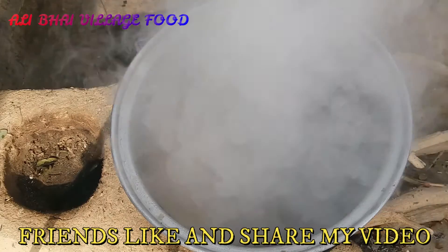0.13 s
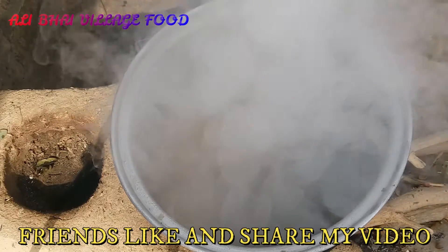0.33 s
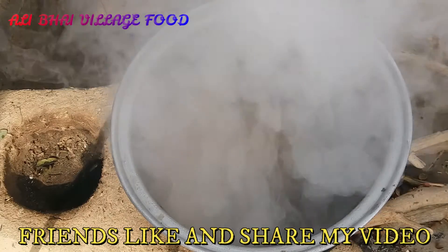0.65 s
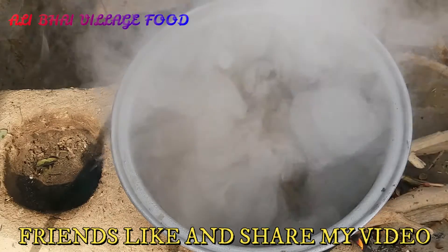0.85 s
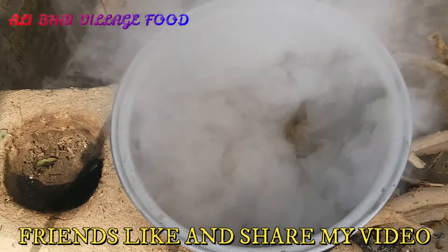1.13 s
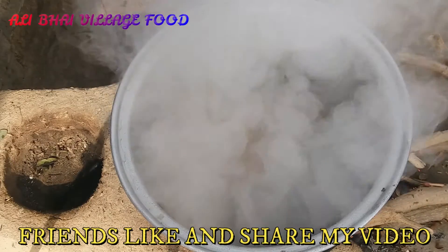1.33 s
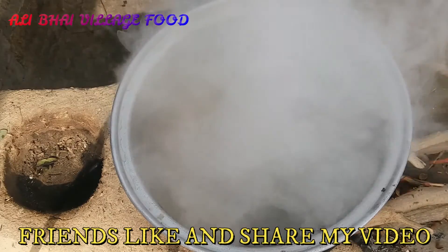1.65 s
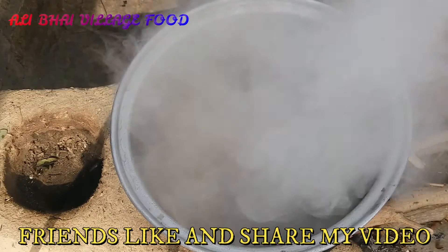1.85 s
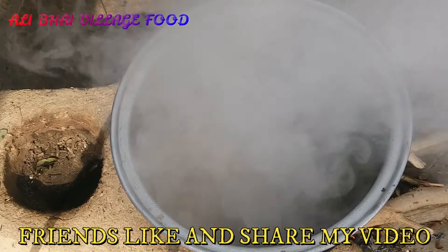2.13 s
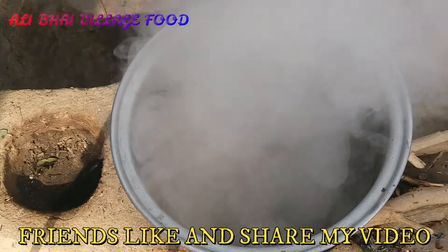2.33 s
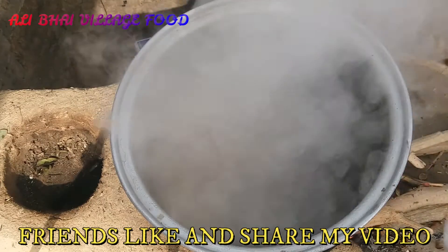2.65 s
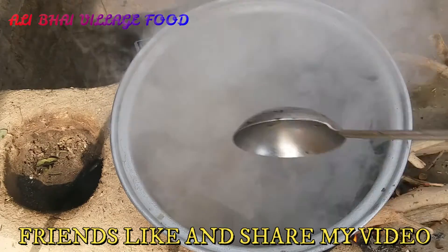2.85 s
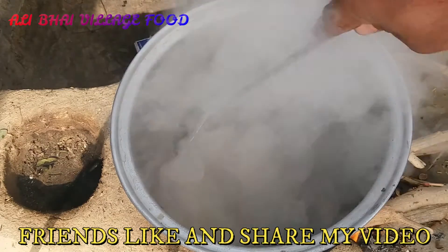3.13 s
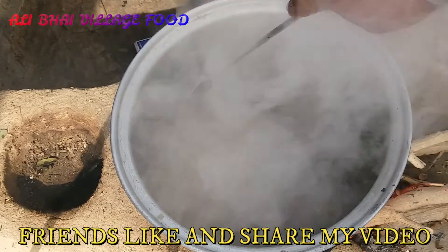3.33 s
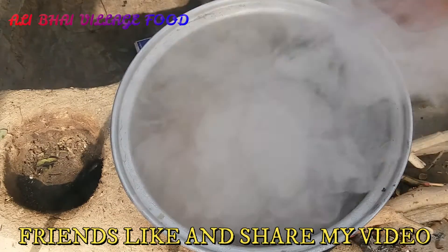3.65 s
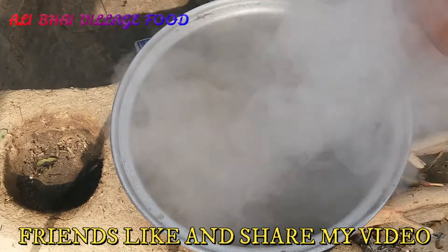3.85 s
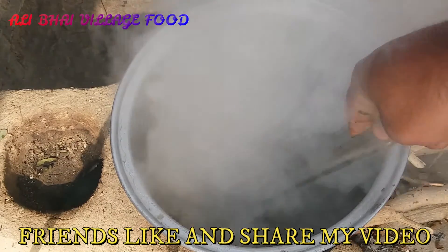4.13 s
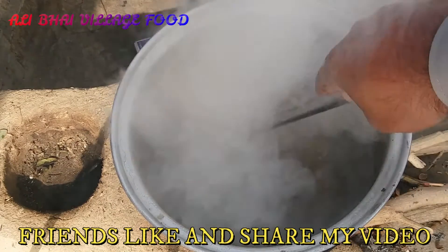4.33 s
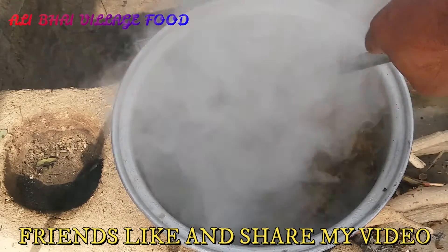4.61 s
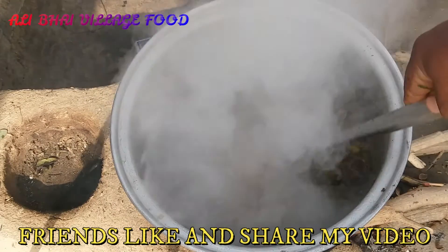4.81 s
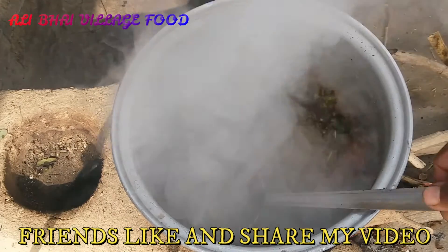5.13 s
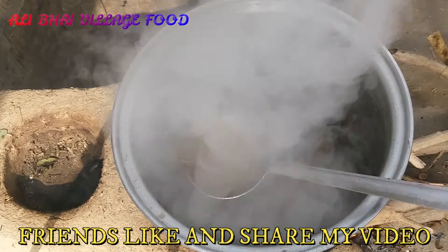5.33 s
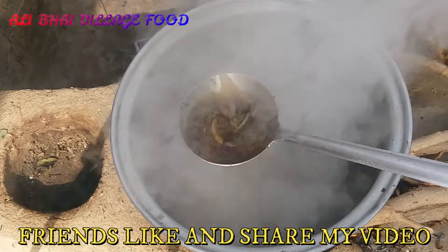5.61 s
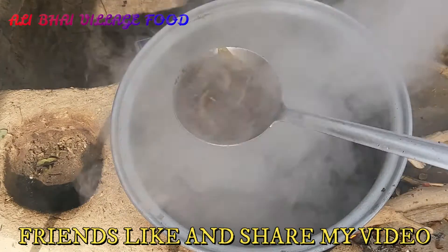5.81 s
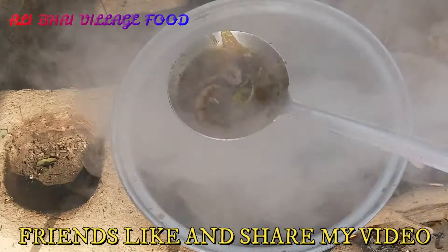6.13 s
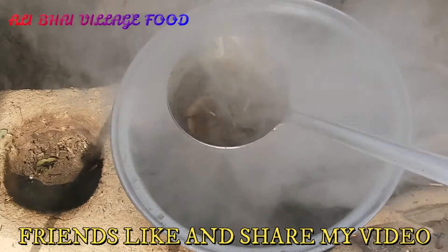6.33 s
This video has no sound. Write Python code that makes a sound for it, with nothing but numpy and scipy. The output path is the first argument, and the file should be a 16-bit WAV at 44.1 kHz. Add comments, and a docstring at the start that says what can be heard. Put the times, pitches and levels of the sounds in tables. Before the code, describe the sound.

Outdoors in a small walled yard, a large pot of stew simmers close to the microphone, soft hiss over low fire rumble with occasional twig snaps. A crow caws across the yard, a steel ladle clacks hard on the pot, then stirs with short sizzling sloshes as a second, hoarser caw sounds. The ladle lifts, drops trickle and plink, and a goat begins a quavering bleat, cut off at the end.

```python
"""Stew simmering over a wood fire

A big metal pot of stew simmers in a village yard: noise bursts make its hiss, rumble and cracking twigs.
A ladle knocks (fading sine tones) and stirs, washing broth up the hot wall, where shaped noise sizzles.
Then it lifts and drips, each drop a puff of noise and a tiny ringing bubble.
A crow caws twice and a goat starts a quavering bleat, both pulses and air through throat resonances;
a faint far call is one sinking tone. The yard walls answer with echoes."""
import sys
import numpy as np
from scipy import signal
from scipy.fft import rfft, irfft, next_fast_len
from scipy.io import wavfile
from scipy.ndimage import uniform_filter1d, map_coordinates

SR = 44100
rng = np.random.default_rng(int(sys.argv[2]) if len(sys.argv) > 2 else 0)


def to_wav(sig):
    """Store sig (one row per channel, or 1-D mono) as 16-bit WAV at the path in sys.argv[1].

    Samples outside -1..1 are clipped; the rate is SR.
    """
    pcm = np.clip(np.atleast_2d(sig), -1, 1) * 32767
    pcm = np.round(pcm).astype(np.int16)
    wavfile.write(sys.argv[1], SR, pcm.T)  # frames by channels


N = 285568  # length of the scene in samples


def amp(db):
    """Decibels to gain."""
    return 10 ** (np.asarray(db) / 20)


def unit(x):
    """Scaled to rms 1."""
    return x / np.sqrt(np.mean(x ** 2) + 1e-20)


def clock():
    """The time of every sample, in seconds."""
    return np.arange(N) / SR


def along(points, hz):
    """Read (frequency, value) points at hz, on a log frequency axis."""
    f, v = np.transpose(points)
    return np.interp(np.log(hz + 1), np.log(f + 1), v)


def curves(rows):
    """One value per sample for each column after the time."""
    s, *cols = np.transpose(rows)
    return [np.interp(clock(), s, c) for c in cols]


def wobble(rate):
    """A smooth random curve with rate knots a second."""
    knots = rng.standard_normal(int(N * rate / SR) + 4)
    return map_coordinates(knots, [np.arange(N) * rate / SR])


def envelope(start, length, attack, release):
    """A smooth rise from start, a hold until length has passed, then a smooth fall."""
    t = clock() - start
    ramp = np.minimum(t / attack, 1 - (t - length) / release)
    return np.sin(np.pi / 2 * np.clip(ramp, 0, 1)) ** 2


def swell(s, width):
    """A bell-shaped push that reaches 1 at time s."""
    return np.exp(-np.minimum(((clock() - s) / width) ** 2, 20))


def filtered(x, response):
    """x times a complex response of frequency."""
    m = next_fast_len(N + SR // 2)
    return irfft(rfft(x, m) * response(np.fft.rfftfreq(m, 1 / SR)), m)[..., :N]


def coloured(x, spectrum):
    """x through a causal filter with the given (frequency [Hz], gain [dB]) shape."""
    size = 4096
    cepstrum = irfft(np.log(amp(along(spectrum, np.fft.rfftfreq(size, 1 / SR))) + 1e-6))
    # folding the cepstrum makes the filter respond as early as it can
    cepstrum[1:size // 2] *= 2
    cepstrum[size // 2 + 1:] = 0
    impulse = irfft(np.exp(rfft(cepstrum)))
    return filtered(x, lambda hz: rfft(impulse, next_fast_len(N + SR // 2)))


def add(track, s, sound):
    """Mix a sound in at time s."""
    part = track[..., round(s * SR):][..., :sound.shape[-1]]
    part += sound[..., :part.shape[-1]]


def burst(t, t60):
    """A stereo puff of noise that falls by 60 dB within t60 seconds."""
    return rng.standard_normal((2, len(t))) * amp(-60 * t / t60)


# how alike left and right sound: (frequency [Hz], likeness [0-1])
LIKENESS = [(60, 0.99), (130, 1), (290, 0.84), (640, 0.8), (1400, 0.36), (6000, 0.28), (15000, 0.15)]


def spread(pair):
    """Two unrelated signals to left and right: alike in the bass, apart in the treble."""
    def turn(hz):
        return np.arccos(np.clip(along(LIKENESS, hz), -1, 1)) / 2
    mid, side = filtered(pair, lambda hz: np.array([np.cos(turn(hz)), np.sin(turn(hz))]))
    return np.array([mid + side, mid - side])


def bubbling(spectrum, rate, pop_db, patchy_db):
    """Countless tiny bursts merge to a patchy rush; rate a second stand out as single pops."""
    z = signal.stft(rng.standard_normal((2, N)), nperseg=512)[2]
    # random patches, smoothed over frequency and then over time
    field = uniform_filter1d(rng.standard_normal(z.shape[1:]), size=5, axis=0)
    field = uniform_filter1d(field, size=8, axis=1)
    rush = signal.istft(z * amp(patchy_db * unit(field)), nperseg=512)[1][:, :N]
    pops = (rng.random((2, N)) < rate / SR) * rng.standard_normal((2, N))
    return unit(coloured(spread(unit(rush) + amp(pop_db) * unit(pops)), spectrum))


# how long the yard's echo tail takes to fall by 60 dB: (frequency [Hz], time [s])
YARD_TAIL = [(200, 0.13), (2000, 0.33), (10000, 0.013)]


def yard(x, wet_db, walls_db, farthest=.012):
    """Direct sound, a few echoes off near walls and a short tail, different at each ear."""
    hz, t, z = signal.stft(rng.standard_normal((2, SR // 3)), SR, nperseg=256)
    tail = signal.istft(z * amp(-60 * t / along(YARD_TAIL, hz)[:, None]), SR, nperseg=256)[1]
    echo = amp(wet_db) * tail / np.linalg.norm(tail[0])
    for ear in echo:
        arrivals = (rng.uniform(.0005, farthest, size=8) * SR).astype(int)
        ear[arrivals] += amp(walls_db) * rng.choice([-1, 1], size=8) / np.sqrt(8)
    echo[:, 0] += 1  # the direct sound
    return signal.fftconvolve(np.atleast_2d(x), echo / np.linalg.norm(echo[0]), axes=1)[:, :N]


def voice(pitch, jitter):
    """One pulse per cycle of a vibrating membrane, and the air that rushes through as it opens."""
    phase = 2 * np.pi * np.cumsum(pitch * (1 + jitter * wobble(150))) / SR
    order = np.floor(SR / 2 / pitch.max()) - 1  # as many harmonics as fit
    cycle = (phase / np.pi + 1) % 2 / 2 - .5
    pulses = np.sinc((2 * order + 1) * cycle) / np.sinc(cycle)
    air = rng.standard_normal(N) * np.exp(0.11 * np.cos(phase))
    return unit(pulses - pulses.mean()), unit(air)


def blend(pulses, air, rough):
    """Mix pulses and air so that a share rough of the power is air."""
    share = np.clip(rough, 0, 1)
    return np.sqrt(1 - share) * pulses + np.sqrt(share) * air


def resonances(modes, broad_hz, low_db):
    """The shape of a set of steep-sided resonances; broad_hz widens all, low_db lifts the lowest."""
    hz = np.geomspace(50, 20000, num=600)
    power = 0
    for centre, width, db in modes:
        power = power + amp(db) ** 2 / (1 + ((hz - centre) / (width + broad_hz)) ** 2) ** 2
    return np.transpose([hz, 10 * np.log10(power) + along([(1200, low_db), (1700, 0)], hz)])


FAR_START_S, FAR_LENGTH_S, FAR_FADE_S = 4.32, 0.25, 0.045
FAR_HZ, FAR_SAG_HZ_PER_S, FAR_DB = 642, 175, -51.5  # first pitch, how fast it sinks, level


def far_call():
    """Only the lowest partial of a distant call carries this far: a faint tone that sinks in pitch."""
    since = np.clip(clock() - FAR_START_S, 0, 1)
    tone = unit(np.sin(2 * np.pi * np.cumsum(FAR_HZ - FAR_SAG_HZ_PER_S * since) / SR))
    level = amp(FAR_DB) * envelope(FAR_START_S, FAR_LENGTH_S, FAR_FADE_S, FAR_FADE_S)
    return yard(level * tone, wet_db=-10, walls_db=-10)


# how strongly the pot hisses and rumbles:
# (time [s], hiss level [dB], rumble level [dB]), before flicker and left-right balance
BOIL_LEVELS = [(0.0, -45.5, -52), (0.35, -51, -58), (0.9, -56, -58), (1.26, -46, -50), (1.9, -44, -48),
               (4.6, -42.5, -48.5), (5.05, -47.5, -47.5), (6.48, -47, -46)]
# tone of the fine bubbles: (frequency [Hz], relative level per Hz [dB])
HISS_TONE = [(150, -35), (250, -0.5), (298, -1.5), (393, -0.5), (444, -2.5), (618, -2.5), (831, -6.5),
             (1140, -4), (1330, -7.5), (1850, -4.5), (2320, -7), (6040, 0.5), (9490, -19), (15200, -16.5),
             (16000, -12.5)]
# tone of the fire and boil: (frequency [Hz], relative level per Hz [dB])
RUMBLE_TONE = [(15, -36), (25, -47), (41, -17), (86, 2.5), (118, -5), (151, -4.5), (206, -11.5), (292, -28),
               (400, -24.5), (520, -46), (880, -120)]


def simmer():
    """Fine bubbles hiss at the pot's rim over the rumble of fire and boil."""
    hiss_db, rumble_db = curves(BOIL_LEVELS)
    hiss = bubbling(HISS_TONE, rate=350, pop_db=-6.0, patchy_db=2.5)
    hiss = amp(hiss_db + 2.34 * wobble(6.8)) * hiss
    rumble = bubbling(RUMBLE_TONE, rate=37, pop_db=-31.0, patchy_db=1.0)
    rumble = amp(rumble_db + 0.53 * wobble(22)) * rumble
    return (hiss + rumble) * amp([[.7], [-.7]])  # slightly to the left


# cracks of burning twigs: (time [s], relative level [dB])
TWIG_CRACKS = [(0.264, -35.5), (1.0425, -42.5), (1.5054, -40), (1.7631, -27.5), (2.23, -37.5),
               (4.2094, -31), (4.8246, -46), (5.3877, -33)]
# tone of a crack: (frequency [Hz], filter gain [dB])
SNAP_TONE = [(200, -36), (900, 8.5), (2500, 9.5), (4500, 21.5), (6500, 20), (9000, 9.5), (16000, -2)]


def twigs():
    """Wood splits in the fire with a dry snap: a very short puff of noise."""
    out, t = np.zeros((2, N)), np.arange(SR // 8) / SR
    for s, db in TWIG_CRACKS:
        add(out, s, amp(db - 10.5) * burst(t, 0.048))
    return coloured(spread(out), SNAP_TONE)


# the goat's throat: (resonance [Hz], basic width [Hz], relative level [dB])
GOAT_RESONANCES = [(735, 10, -1.5), (1160, 9, -6), (1840, 40, -10.5), (2440, 17, -3), (2836, 12, 4),
                   (3070, 41, -1), (4080, 37, -7), (4360, 62, 2), (4800, 32, -21), (5070, 65, -15)]
# quavers of the bleat: (time [s], pitch lift [Hz])
PITCH_QUAVERS = [(6.09, 53.2), (6.182, 41.6), (6.274, 44.7), (6.329, 34.17), (6.416, 60.4), (6.485, 31.47)]
QUAVER_S = .027  # width of each bell-shaped quaver, from its middle to 1/e
BLEAT_START_S, BLEAT_ATTACK_S, BLEAT_DB = 5.955, 0.04, -31  # level before the mouth's effect
OPEN_S, OPENING_S = 6.3, .32  # the mouth is wide open at this time, after opening for this long
# pitch under the quavers, closed and open; a closed mouth is softer than an open one by CLOSED_DB
CLOSED_HZ, OPEN_HZ, CLOSED_DB = 310.5, 360.6, -6.5
# share of air on a steady pitch, and the pitch speed that would leave only air
BLEAT_ROUGH, ROUGH_SWING_HZ_PER_S = .06, 6500


def goat():
    """A bleat that rises as the mouth opens and quavers on top; it turns rough while the pitch swings."""
    opening = envelope(OPEN_S - OPENING_S, N / SR, OPENING_S, OPENING_S)
    quaver = sum(lift * swell(s, QUAVER_S) for s, lift in PITCH_QUAVERS)
    pitch = CLOSED_HZ + (OPEN_HZ - CLOSED_HZ) * opening + quaver
    # nearly clean on a steady pitch; the faster the pitch moves, the more air
    rough = BLEAT_ROUGH + np.abs(np.gradient(pitch)) * SR / ROUGH_SWING_HZ_PER_S
    pulses, air = voice(pitch, jitter=.006)
    # every quaver pushes harder as the pitch rises
    push = pitch / uniform_filter1d(pitch, size=SR // 10) - 1
    cry = np.zeros(N)
    for formant in GOAT_RESONANCES:
        # the trembling throat makes each resonance flutter on its own; the low ones stay clear
        flutter = amp(20 * push + 2.6 * wobble(55))
        source = blend(pulses, air, rough * min(formant[0] / 2000, 1))
        cry += flutter * coloured(source, resonances([formant], broad_hz=142, low_db=2.5))
    # weak fundamental, little treble
    cry = coloured(cry, [(380, -12.5), (620, -5.5), (5300, -2.5), (7000, -10), (11000, -25)])
    sounding = envelope(BLEAT_START_S, N / SR, BLEAT_ATTACK_S, BLEAT_ATTACK_S)
    level = amp(BLEAT_DB + CLOSED_DB * (1.5 - opening)) * sounding
    cry = cry / cry[sounding > 0].std() * level
    return yard(cry, wet_db=-11, walls_db=-6, farthest=.006)


# the crow's throat in each caw: (resonance [Hz], basic width [Hz], relative level [dB])
FIRST_CAW_THROAT = [(770, 7, -14), (1210, 17, -13.5), (1410, 64, -12), (1763, 27, 1.5), (1900, 10, -6),
                    (2094, 16, 0.5), (2500, 75, -11), (2930, 56, -17)]
SECOND_CAW_THROAT = [(640, 16, -25), (810, 56, -15.5), (940, 22, -23), (1375, 40, -4.5), (1850, 71, 2),
                     (2090, 27, -7.5), (2335, 48, -5), (2880, 20, -24), (3110, 30, -12.5)]
# tone of the airy upper part of a caw: (frequency [Hz], relative level per Hz [dB])
RASP_TONE = [(1940, -34), (3300, -6.5), (3470, -14.5), (4000, -10), (4310, 0), (5350, -0.5), (6480, -9),
             (6960, -7), (9460, -31), (11000, -45), (14300, -54), (22000, -120)]
# (start [s], length [s], time of greatest effort [s], width of that push [s],
#  top pulse rate [Hz], least roughness [0-1], voice level at full effort [dB], rasp level likewise [dB])
CAW_CALLS = [(2.995, 0.316, 3.195, .15, 80.64, 0.04, -28.5, -31.5),
             (4.02, 0.34, 4.255, .135, 76.7, 0.2, -29.5, -32)]
CAW_ATTACK_S, CAW_RELEASE_S = 0.077, 0.051
SLACK_SAG_HZ, SLACK_ROUGH = 9.5, 0.55  # a slack throat beats slower and hoarser
SLACK_VOICE_DB, SLACK_RASP_DB = -5, -6  # a slack throat is also softer


def caw(row, throat, broad_hz):
    """Slow pulses ring the throat, with mostly air above; effort makes it faster, clearer and louder."""
    start, length, peak_s, width, top_hz, least_rough, voice_db, rasp_db = row
    slack = 1 - swell(peak_s, width)
    rough = least_rough + (SLACK_ROUGH - least_rough) * slack
    pulses, air = voice(top_hz - SLACK_SAG_HZ * slack, jitter=.002)
    body = unit(coloured(blend(pulses, air, rough), resonances(throat, broad_hz, low_db=3.5)))
    rasp = unit(coloured(blend(pulses, air, rough + 0.76), RASP_TONE))
    level = envelope(start, length, CAW_ATTACK_S, CAW_RELEASE_S) * amp(0.46 * wobble(78))
    body = amp(voice_db + SLACK_VOICE_DB * slack) * body
    rasp = amp(rasp_db + SLACK_RASP_DB * slack) * rasp
    return level * (body + rasp)


def crow():
    """Two caws, the second lower and hoarser, echoing off the walls."""
    first = caw(CAW_CALLS[0], FIRST_CAW_THROAT, broad_hz=51.4)
    second = caw(CAW_CALLS[1], SECOND_CAW_THROAT, broad_hz=79)
    return yard(first + second, wet_db=-7.5, walls_db=-2)


# sound from across the yard: (frequency [Hz], phase by which left leads right [radians])
LEFT_LEAD = [(500, 0.4), (1300, 2), (2200, 0.91), (4400, 1.65), (5600, 0.41)]


def from_aside(pair):
    """A call from across the yard meets the two microphone ports out of step."""
    return filtered(pair, lambda hz: np.exp(.5j * along(LEFT_LEAD, hz) * np.array([[1], [-1]])))


# drops and splats: (time [s], relative level [dB], starting pitch [Hz])
DROPS = [(3.967, -19, 2800), (5.037, -33.5, 2700), (5.042, -33.5, 1900), (5.243, -29.5, 1700),
         (5.293, -33, 6440), (5.325, -31, 4550), (5.362, -32, 4930), (5.448, -29.5, 6140),
         (5.476, -27.5, 4330), (5.501, -33, 5810), (5.544, -26, 5940), (5.613, -37, 556), (5.625, -28, 630),
         (5.654, -34, 3980)]
TRICKLE_START_S, TRICKLE_S = 5.17, .5
TRICKLE_DB = -39  # level of the softest trickle drop, on the scale of the drops above


def drips():
    """Each drop splats on the broth and rings a tiny bubble; a fine trickle follows the lifted ladle."""
    out, t = np.zeros((2, N)), np.arange(SR // 16) / SR
    bubbles = np.zeros(N)
    trickle = []
    for when, size, small in rng.random((14, 3)):
        trickle.append((TRICKLE_START_S + TRICKLE_S * when, TRICKLE_DB + 5 * size, 1800 * 3.73 ** small))
    for s, db, pitch in list(DROPS) + trickle:
        splat = burst(t, .016)
        # low-pitched drops splat with a duller body
        body = signal.lfilter(*signal.butter(2, np.clip(pitch, 300, 7000), fs=SR), splat)
        add(out, s, amp(db - 8.5) * splat + amp(db - 10) * body / body[:, :SR // 200].std())
        # the bubble's pitch rises as it rings
        ring = np.sin(2 * np.pi * pitch * t * (1 + 6 * t))
        add(bubbles, s, amp(db - 2 - 60 * t / .012) * ring)
    splats = coloured(spread(out), [(150, -7), (600, -9.0), (6500, -1.5), (9000, -1), (15000, -11)])
    return splats + yard(bubbles, wet_db=-16, walls_db=-8)


# tone of the hot wall: (frequency [Hz], relative level per Hz [dB])
SIZZLE_TONE = [(820, -29), (1400, -8.5), (1700, -15), (2260, -2), (2630, -7.5), (2950, -7.5), (3330, -9.5),
               (3690, 1), (6390, 5.5), (10500, -22.5), (13500, -16.5), (16000, -18)]
# tone of the broth as it is pushed, turned and scooped: (frequency [Hz], relative level per Hz [dB])
PUSH_TONE = [(88, -49), (150, -2), (360, -4.5), (431, 2), (611, -6), (969, -3), (1550, -13), (1920, -14),
             (2200, -29), (2860, -44), (4840, -120)]
TURN_TONE = [(88, -32), (150, -8), (329, 5), (390, -4), (597, -7.5), (1200, -8), (2200, -7), (2860, -10),
             (4840, -120)]
SCOOP_TONE = [(88, -43), (150, -18), (254, -10), (315, -7.5), (403, -11), (611, -11.5), (960, 1.5),
              (1300, -9.5), (2200, -8), (2860, -38), (4840, -120)]
# sweeps of the ladle: (start [s], length [s], sizzle rise [s],
#  sizzle level [dB], slosh level [dB]), before flicker and left-right balance
LADLE_SWEEPS = [(3.621, 0.33, 0.089, -33, -41.5), (4.287, .18, 0.11, -34.5, -40),
                (4.41, 0.333, 0.15, -41, -44.5), (4.729, 0.18, 0.13, -27.5, -36.5)]
SWEEP_RELEASE_S = 0.067
SLOSH_PEAK, SLOSH_WIDTH = 0.67, 0.45  # when the broth moves most, and for how long (shares of a sweep)


def stirring():
    """Each sweep of the ladle pushes a wave of broth, and the hot wall sizzles while it is wetted."""
    sizzle = bubbling(SIZZLE_TONE, rate=1500, pop_db=-2, patchy_db=3.2)
    out = np.zeros((2, N))
    tones = [PUSH_TONE, TURN_TONE, TURN_TONE, SCOOP_TONE]
    for (start, length, rise, sizzle_db, slosh_db), tone in zip(LADLE_SWEEPS, tones):
        wave = swell(start + SLOSH_PEAK * length, SLOSH_WIDTH * length) ** .5
        wave = wave * envelope(start, length, SWEEP_RELEASE_S, SWEEP_RELEASE_S)
        slosh = wave * bubbling(tone, rate=130, pop_db=-7, patchy_db=3.0)
        wetting = envelope(start, length, rise, SWEEP_RELEASE_S) * amp(2.3 * wobble(55))
        out += amp(sizzle_db) * wetting * sizzle + amp(slosh_db) * slosh
    return out * amp([[.8], [-.8]])  # slightly to the left


# the ladle strikes the pot wall: (time [s], relative level [dB])
WALL_STRIKES = [(3.4096, -8), (3.5333, -34), (3.993, -21.5)]
# ringing tones of the steel: (frequency [Hz], relative level [dB],
#  time to fall by 60 dB if nothing damped it sooner [s])
STEEL_TONES = [(1010, -15, 0.047), (1600, -4.5, 0.096), (3000, 1.5, 0.032), (3741, -28, 0.095),
               (3890, 10, 0.0079), (4440, -6, 0.03), (5206, 9, 0.029), (5430, 10, 0.005), (5720, 2.5, 0.03),
               (5940, -22, 0.064), (6360, -2, 0.038), (6950, -3, 0.029)]
# dull knocks under the broth: (time [s], relative level [dB], favoured pitch [Hz])
BROTH_KNOCKS = [(3.413, -19, 440), (3.537, -22.5, 180), (3.992, -18, 500), (4.461, -29.5, 358),
                (5.626, -29.5, 228), (6.002, -25.5, 167)]
# ringing tones of the full pot: (frequency [Hz], relative level [dB], time to fall by 60 dB [s])
POT_TONES = [(196, 6.5, 0.033), (258, -2.5, 0.088), (336, 7.5, 0.066), (468, 9.5, 0.058), (630, 4.5, 0.04),
             (890, 1, 0.059), (1210, -24, .04)]
RING_HZ = 1590  # a faint tone rings on after a blow


def ladle():
    """Steel clacks on the wall; the full pot answers with a damped, hollow knock."""
    clack, knock, t = np.zeros((2, N)), np.zeros(N), np.arange(SR // 3) / SR
    for s, db in WALL_STRIKES:
        ring = np.zeros(len(t))
        for hz, g, t60 in STEEL_TONES:
            fade = amp(g - 60 * t / min(t60, .028))  # no tone rings longer than this
            ring += fade * np.sin(2 * np.pi * (hz * t + rng.random()))
        ring = ring / ring[:SR // 200].std()
        after_ring = amp(-36 - 60 * t / .22) * np.sin(2 * np.pi * RING_HZ * t)
        add(clack, s, amp(db - 12) * (ring + after_ring + amp(-5) * burst(t, 0.054)))
    for s, db, pitch in BROTH_KNOCKS:
        ring = np.zeros(len(t))
        for hz, g, t60 in POT_TONES:
            # tones near the favoured pitch are loudest: a softer contact favours the lower ones
            favour = -8.4 * np.log2(hz / pitch) ** 2
            ring += amp(g + rng.normal(0, 1) + favour - 60 * t / t60) * np.sin(2 * np.pi * hz * t)
        add(knock, s, amp(db + 2.0) * ring / np.abs(ring).max())
    knock = coloured(knock, [(40, -83), (130, 1.5)])  # the pot is too small to radiate deep bass
    clack = coloured(clack, [(7000, 6), (9000, -3), (12000, 0)])
    clack = yard(clack, wet_db=-14.0, walls_db=-33) * amp([[2], [-2]])  # to the left
    return clack + yard(knock, wet_db=-15.0, walls_db=-19.5)


def scene():
    """The hearth close by, the animals across the yard."""
    animals = from_aside(goat() * amp([[.9], [-.9]]) + crow())
    hearth = simmer() + twigs() + drips() + stirring() + ladle()
    return far_call() + animals + hearth


TOP_HZ = 16000


def record(dry):
    """The microphone keeps nothing above its band limit."""
    return filtered(dry, lambda hz: hz < TOP_HZ)


dry = scene()
out = record(dry)
to_wav(out)
```